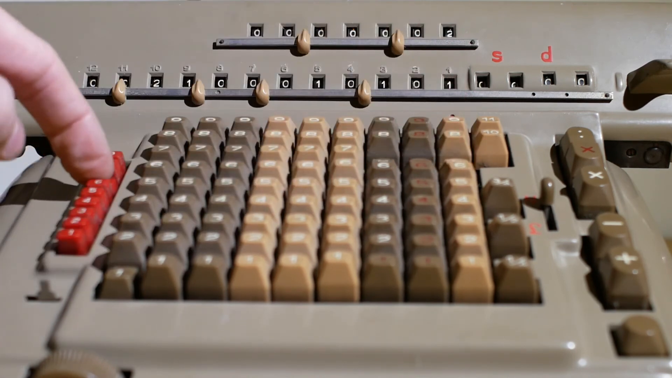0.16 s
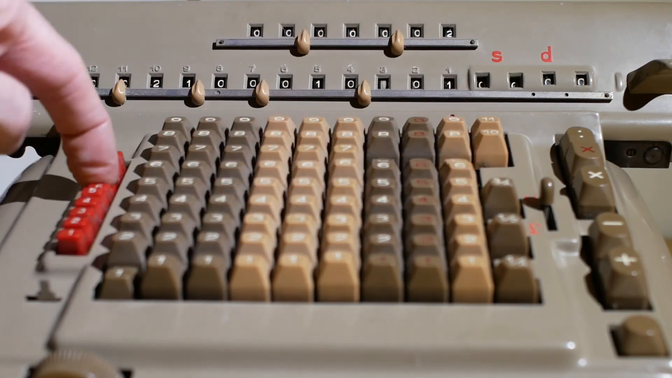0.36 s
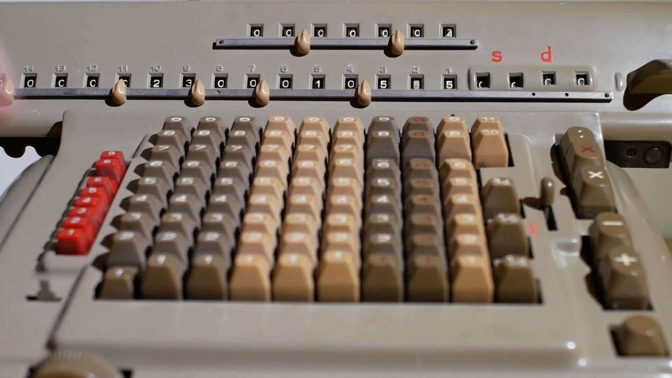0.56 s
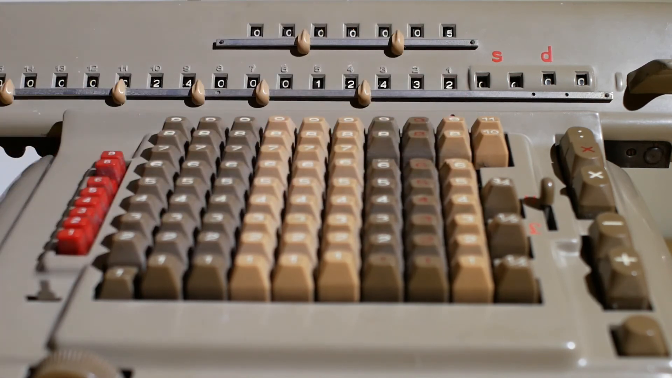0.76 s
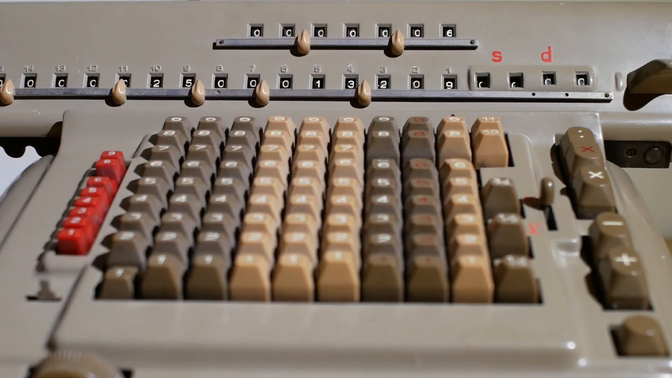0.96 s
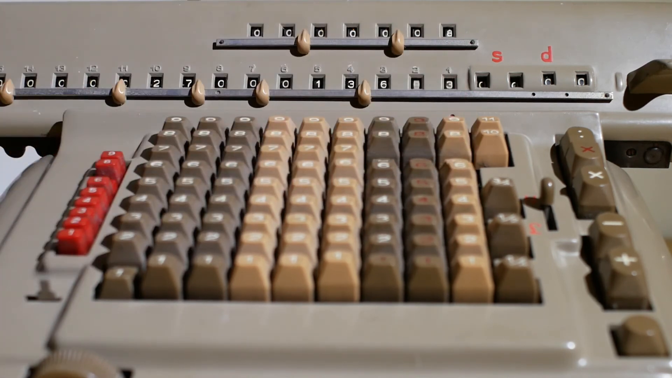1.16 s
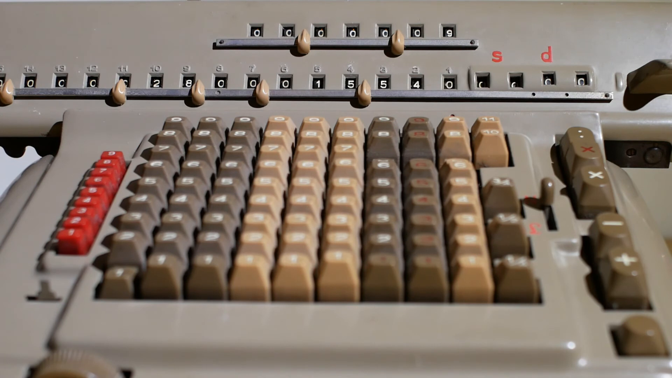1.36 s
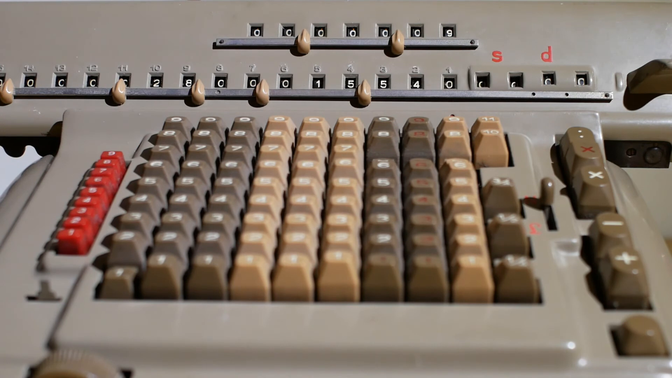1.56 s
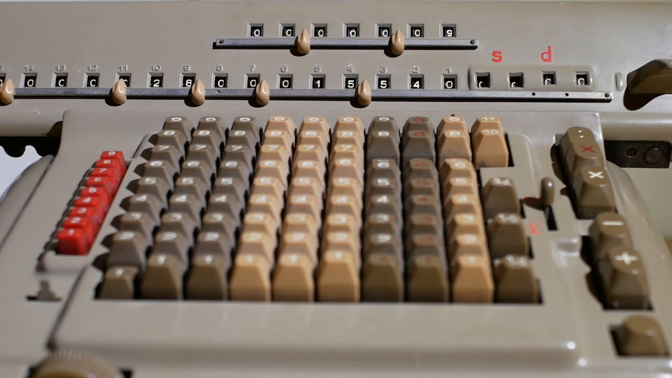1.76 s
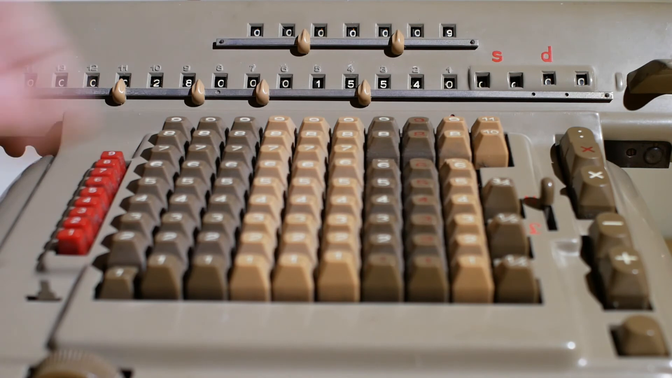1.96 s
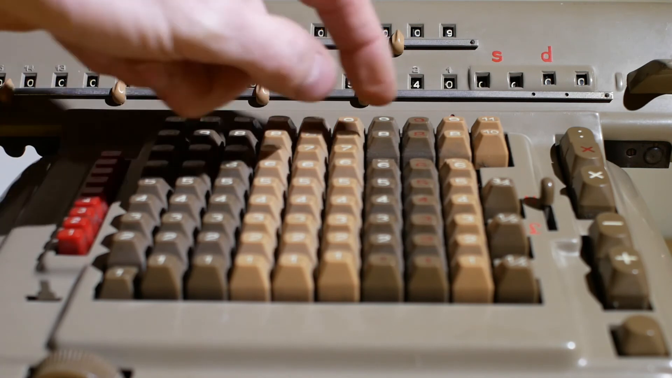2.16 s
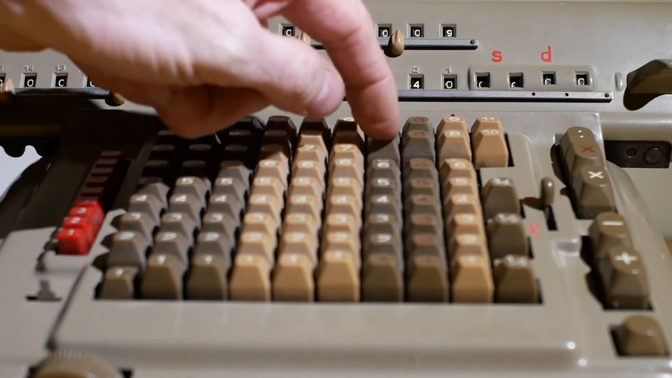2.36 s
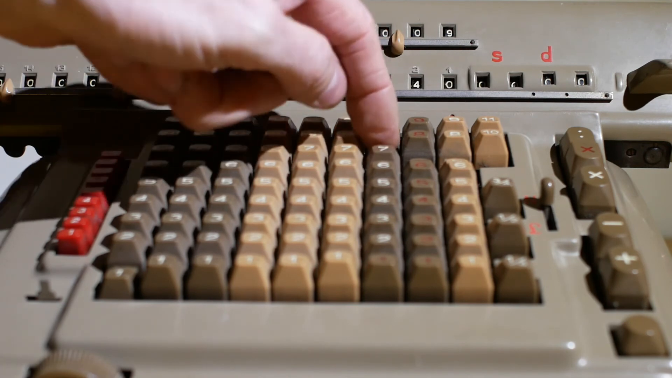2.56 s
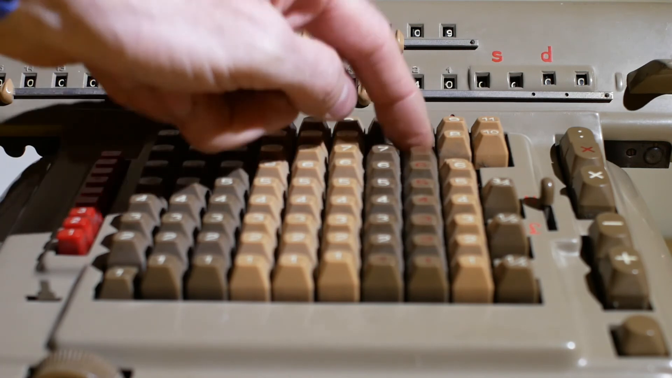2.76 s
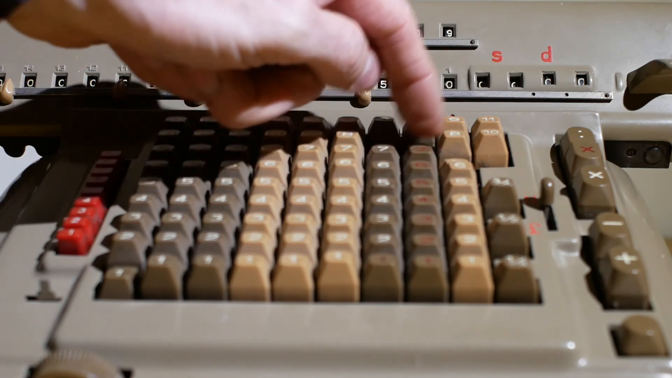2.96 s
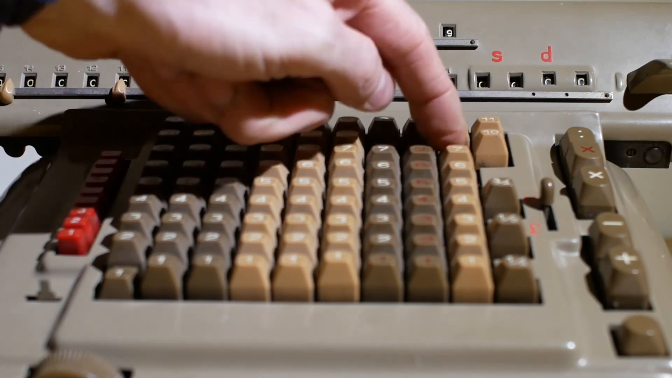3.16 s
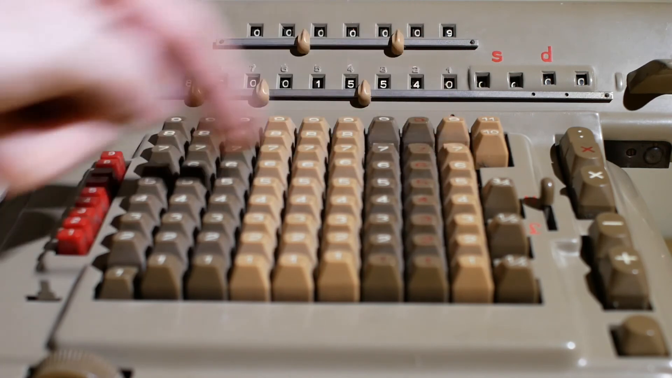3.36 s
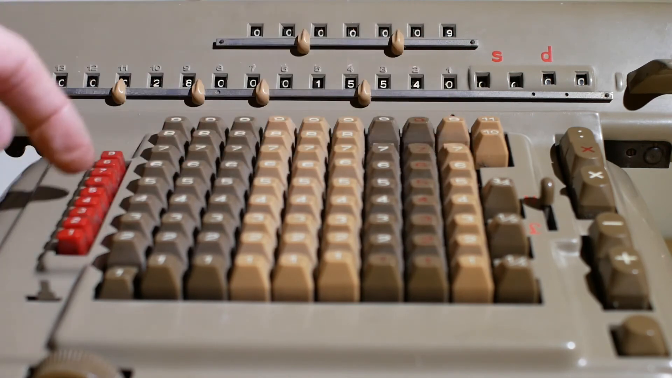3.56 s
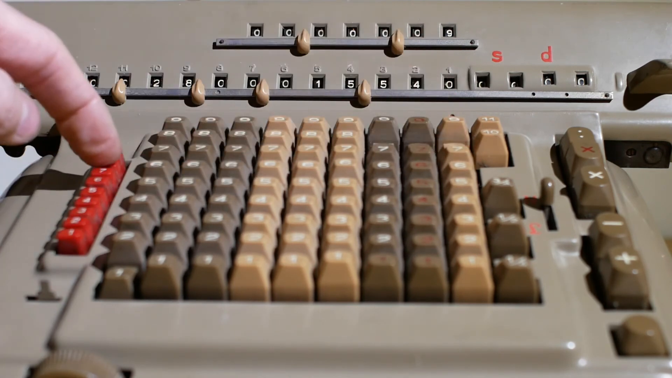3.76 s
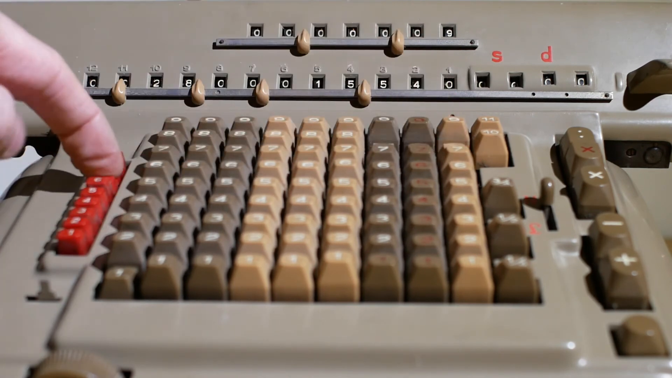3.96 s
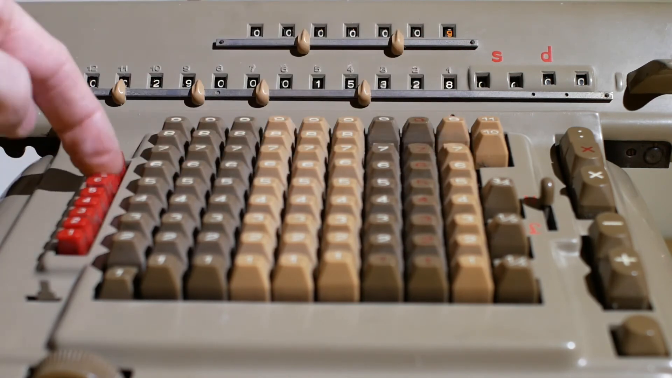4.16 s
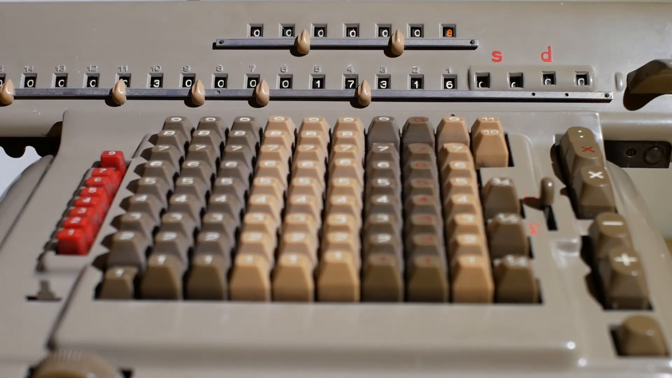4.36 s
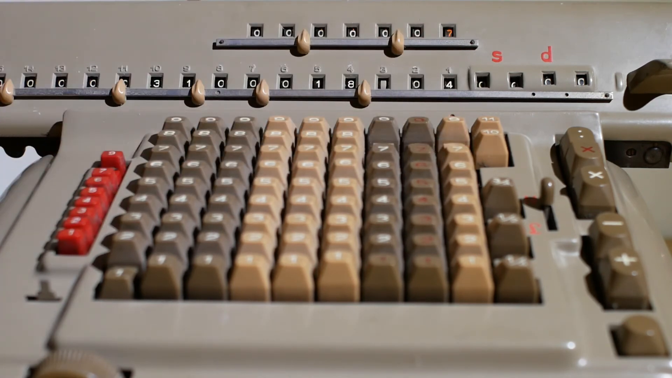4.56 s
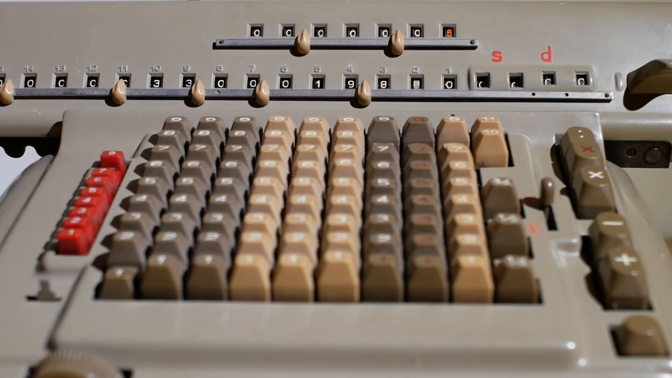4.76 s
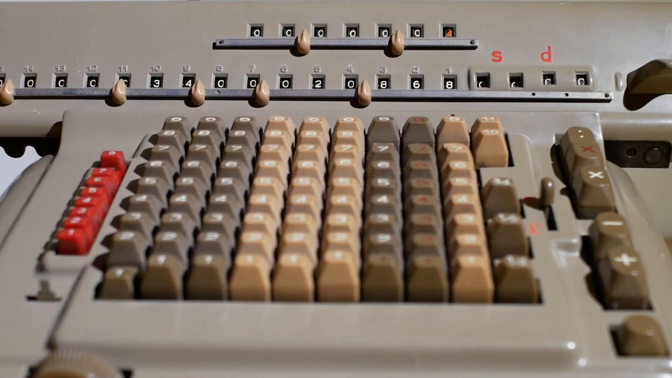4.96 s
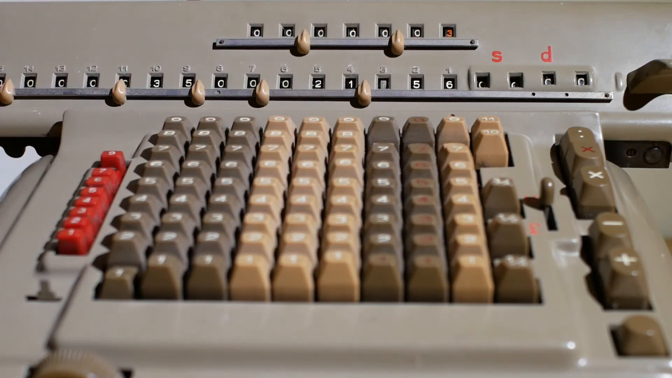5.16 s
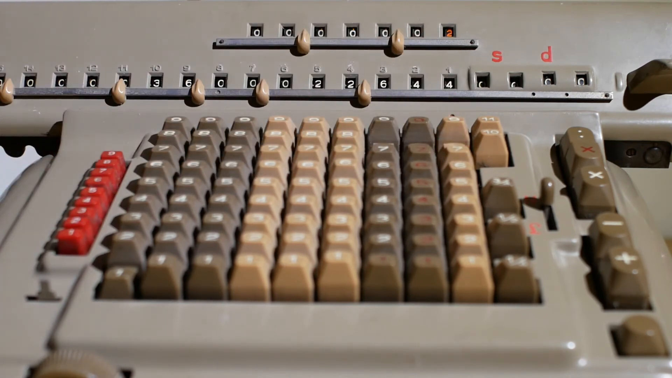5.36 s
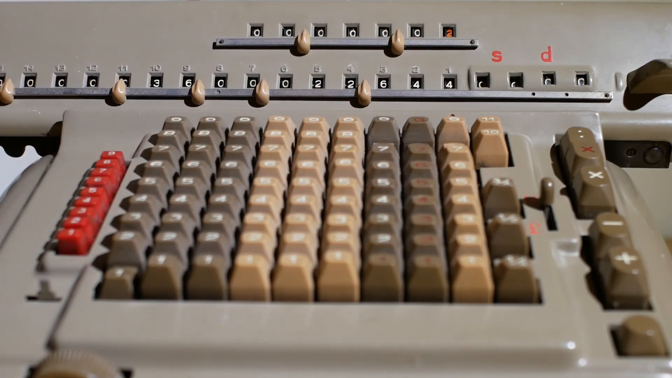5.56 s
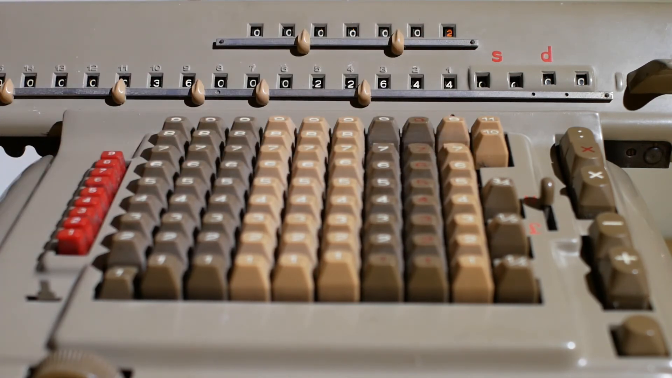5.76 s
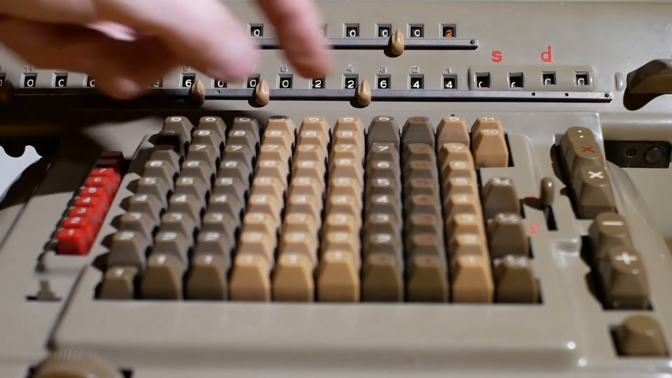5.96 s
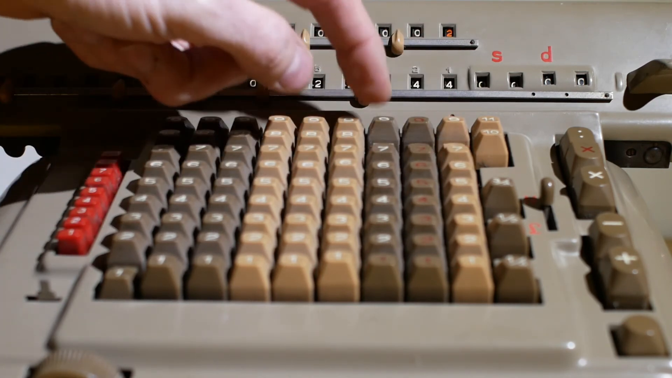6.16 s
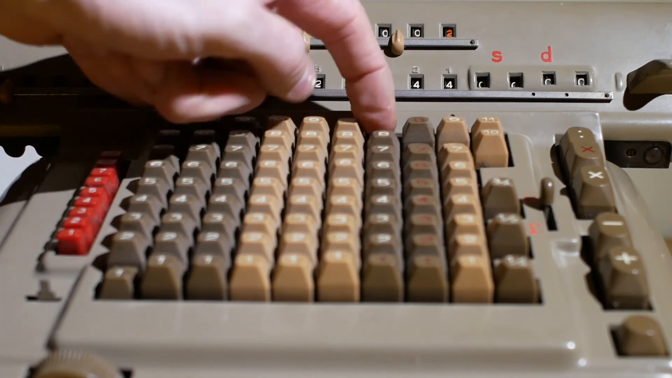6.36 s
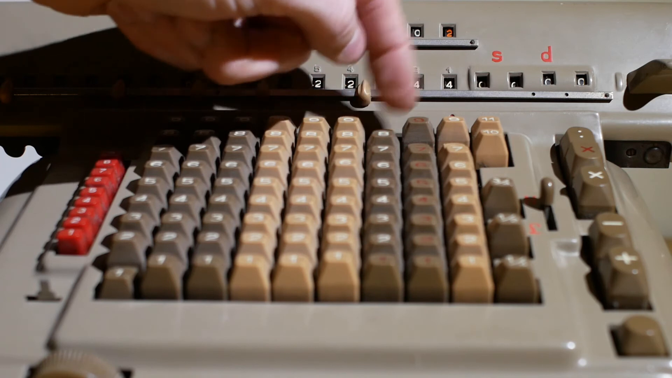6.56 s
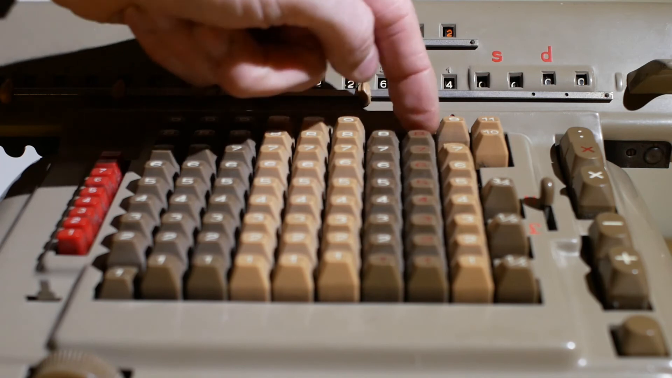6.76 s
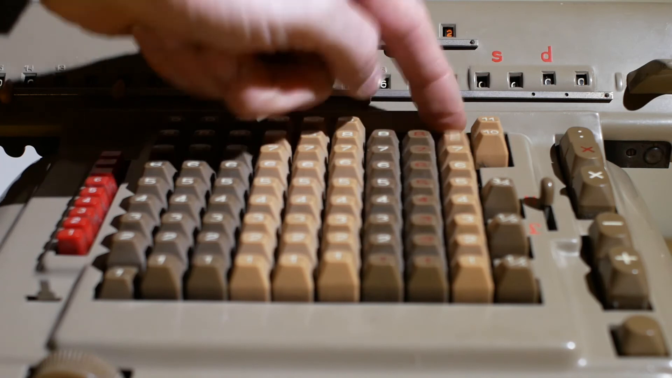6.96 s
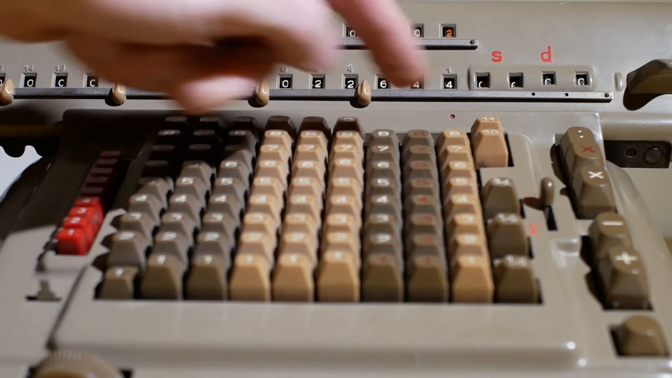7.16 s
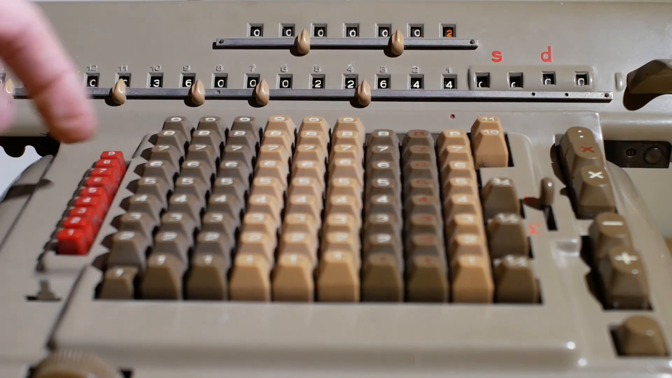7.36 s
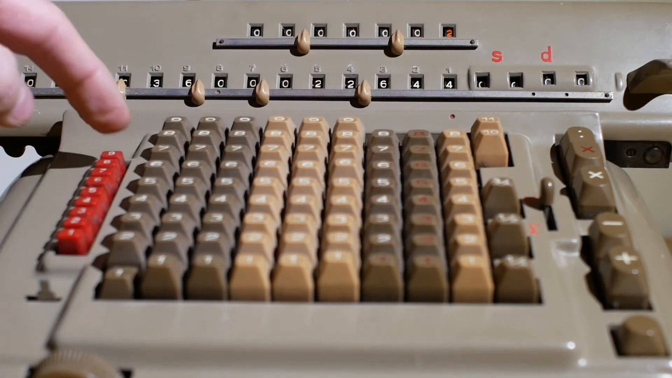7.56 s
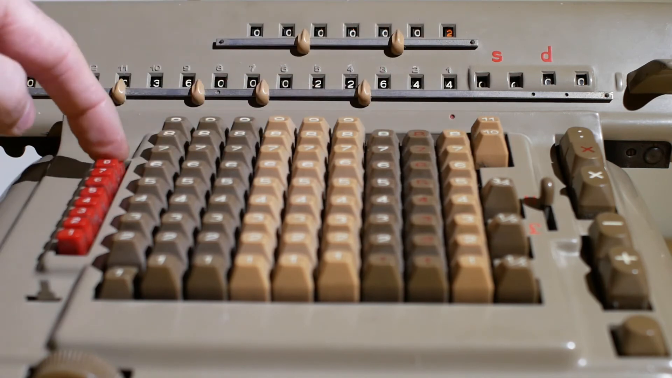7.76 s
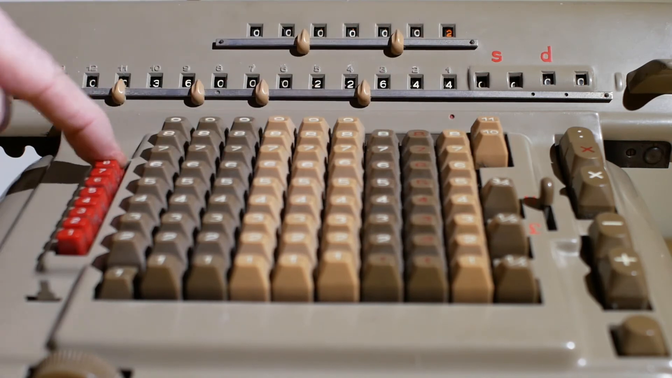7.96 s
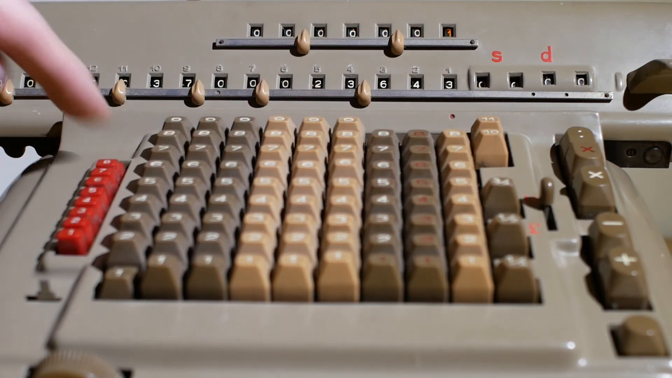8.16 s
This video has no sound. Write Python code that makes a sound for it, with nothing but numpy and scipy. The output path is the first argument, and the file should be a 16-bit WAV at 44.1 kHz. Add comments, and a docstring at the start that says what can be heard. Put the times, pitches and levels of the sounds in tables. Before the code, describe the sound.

A motor-driven mechanical calculator sits close to two microphones in a quiet, slightly reflective room with a low steady room tone. After faint fingertip clicks, a hard key snap at 0.2 s starts the motor; the clutch bites at 0.33 s and gears clatter, with a bright clack and springy tick about 6.6 times a second, loose metal knocking, number racks slamming and a throbbing midrange whine. It lets go with clunks around 1.4 s and the whirr coasts away by 2.3 s. Firm digit keys snap down at about 2.4, 2.8 and 3.1 s, with lighter releases. The motor key at 4.0 s starts a similar run until 5.3 s, fading by about 6.2 s with small settling clicks. Three more digit keys fall at 6.3, 6.7 and 7.0 s. A light click at 7.6 s precedes the last start at 7.9 s; clattering resumes and is cut off abruptly around 8.4 s.

```python
"""A mechanical calculator on a desk in a quiet room, close to two microphones.
A finger presses digit keys as well as a motor key that starts each of three runs: the main shaft turns
about 6.6 times a second, a pawl ticks and a stop clacks once a turn, and the motor coasts to rest.
Blows are noise bursts, pitched knocks and rings; gears are streams of random contacts through resonances;
the whine is throbbing sine tones. Sparse reflections and a steady room tone surround the machine."""
import sys
import numpy as np
from scipy import signal
from scipy.fft import rfft, irfft, next_fast_len
from scipy.io import wavfile
from scipy.ndimage import uniform_filter1d

SR = 44100
rng = np.random.default_rng(int(sys.argv[2]) if len(sys.argv) > 2 else 0)


def dump(signal):
    """Clip the signal to [-1, 1] and save it as 16-bit WAV at the path in sys.argv[1]."""
    limited = np.clip(np.atleast_2d(signal).T, -1, 1)
    pcm = np.round(limited * 32767).astype(np.int16)
    wavfile.write(sys.argv[1], SR, pcm)


N = 365587  # samples

# Levels in the tables are relative: each layer's trim and the final mix come after them.


def gain_of(db):
    """Decibels to gain."""
    return 10 ** (np.asarray(db) / 20)


def evened(x):
    """Scales to rms 1."""
    return x / np.sqrt(np.mean(x ** 2) + 1e-20)


def read(points, hz):
    """Reads a spectrum on a log-frequency axis."""
    f, value = np.transpose(points)
    return np.interp(np.log(hz + 1), np.log(f + 1), value)


def bumps(hz, modes):
    """Resonant bumps in dB."""
    return sum(lift / (1 + (2 * (hz - f) / width) ** 2) for f, width, lift in modes)


def add(mix, s, sound):
    """Mixes a sound in at s seconds."""
    part = mix[round(s * SR):][:len(sound)]
    part += sound[:len(part)]


def fade_in(t, rise_s):
    """A straight rise from silence to full level."""
    return np.minimum(t / rise_s, 1)


def decay(peak_db, t, t60):
    """An exponential decay that falls 60 dB in t60 seconds."""
    return gain_of(peak_db - 60 * t / t60)


def coloured(x, points, modes):
    """Causal minimum-phase filter of energy 1: a smooth spectrum with resonant bumps on it."""
    hz = np.abs(np.fft.fftfreq(8192, 1 / SR))
    db = read(points, hz) + bumps(hz, modes)
    log_gain = np.log(gain_of(np.maximum(db - db.max(), -100)))
    minimum_phase = np.exp(np.conj(signal.hilbert(log_gain)))
    taps = np.fft.ifft(minimum_phase).real[:4096]
    return signal.oaconvolve(x, taps / np.linalg.norm(taps))[:N]


def ring(x, modes):
    """Sum of two-pole resonances."""
    return sum(gain_of(db) * signal.lfilter(*signal.iirpeak(hz, hz / width, SR), x) for hz, width, db in modes)


def resonate(x, hz, width):
    """A moving resonance: shifts the curve hz down to zero, smooths, and shifts back."""
    turn = np.exp(2j * np.pi * np.cumsum(hz) / SR)
    r = np.exp(-np.pi * width / SR)
    return 2 * (turn * signal.lfilter([1 - r], [1, -r], x / turn)).real


def grit(count, per_s, spread_db, smooth):
    """Sparse contacts of uneven size over a little smooth noise, rms 1."""
    chance, size, sign = rng.random((3, count))
    sizes = gain_of(spread_db * np.minimum(-np.log(size + 1e-9), 4))
    contacts = sizes * (chance < per_s / SR) * np.sign(sign - .5)
    return evened(evened(contacts) + smooth * rng.standard_normal(count))


# room tone spectrum: (frequency [Hz], level [dB per Hz])
AIR_SPECTRUM = [(15, -74), (25, -43), (130, -13), (200, -3), (575, -13), (754, -10.5), (1400, -20),
                (2480, -29), (10100, -37), (14400, -42), (16000, -69)]
# bands standing out of the room tone: (frequency [Hz], width [Hz], lift [dB])
AIR_HUMS = [(98.6, 12, 11), (192.3, 14, 7), (242.8, 6.9, 8), (746, 23, 7), (1030, 54, 8.5),
            (2520, 330, 8.5)]
# how alike the room tone is at the two microphones: (frequency [Hz], left-right likeness [-1 to 1])
AIR_LIKENESS = [(60, 0.36), (240, 0.77), (950, 0.041), (3770, 0.37), (15000, 0.6)]
AIR_DB = -45.5  # rms before the microphones


def air():
    """Steady room tone: shaped noise, partly shared by both microphones."""
    hz = np.fft.rfftfreq(N, 1 / SR)
    left, other = rfft(rng.standard_normal((2, N)))
    same = np.clip(read(AIR_LIKENESS, hz), -1, 1)
    both = np.array([left, same * left + np.sqrt(1 - same ** 2) * other])
    spectrum = gain_of(read(AIR_SPECTRUM, hz) + bumps(hz, AIR_HUMS))
    return gain_of(AIR_DB) * evened(irfft(both * spectrum, N))


# clicks: a fingertip lands, a lever catches inside a press, a part settles as the motor coasts:
# (time [s], treble level [dB], knock level over the treble [dB])
CLICKS = [(.035, -36, -12), (.1472, -41, -1), (.179, -24.5, -11), (1.9335, -34, -3), (2.149, -42, 1),
          (2.3218, -24.5, -14), (2.41, -38, -3), (2.4254, -33, 5), (3.059, -24, -7), (3.0755, -16, -10),
          (3.66, -42, -8), (3.81, -42, -8), (3.901, -27.5, -18), (3.9154, -28.5, -4), (3.935, -36, -5),
          (5.7353, -33.5, -2), (5.8603, -34, -8), (6.3594, -13.5, -2), (6.959, -26, -17),
          (7.642, -24.5, -16)]
# what else a click holds, over its treble: (case thud [dB], shiver [dB])
CLICK_BODY = (-20, -10)
CLICK_KNOCK_HZ = 2900


def clicks():
    """Short clicks as blow rows, from faint to strong: one knock pitch, differing in level and knock."""
    return [(s, db, knock_db, CLICK_KNOCK_HZ, *CLICK_BODY) for s, db, knock_db in CLICKS]


# motor runs: (motor key time [s], clutch bite time [s], clutch level [dB], halt level [dB])
MOTOR_RUNS = [(0.2242, 0.332, -2.5, -3), (3.9618, 4.0779, -1.5, -7), (7.874, 7.9983, -3, -6)]
# the motor key's two blows: (time from the key cue [s], treble level [dB], knock over the treble [dB],
# knock pitch [Hz], case thud over the treble [dB], shiver over the treble [dB])
MOTOR_KEY_BLOWS = [(0, -6, -10, 3500, -24.5, -8), (.009, -15.5, 2.5, 3290, -22, -1)]


def motor_key():
    """The motor key as blow rows: two blows in quick succession start each run."""
    return [(run[0] + s, *rest) for run in MOTOR_RUNS for s, *rest in MOTOR_KEY_BLOWS]


# shaft turns, one list a run; a stop snaps home inside each turn and the pawl ticks at its end:
# (pawl tick time [s], tick level [dB], stop level [dB], boom level [dB])
SHAFT_TURNS = [
    [(.4873, -11, -7.5, -33), (.6424, -10.5, -7, -26.5), (.7916, -16.5, -7, -34), (.9443, -11, -8, -32.5),
     (1.0934, -10, -8, -31), (1.2426, -11.5, -6, -30.5), (1.3932, -12.5, -12.5, -40)],
    [(4.2373, -10.5, -11, -33), (4.3874, -11, -4, -34), (4.5376, -10.5, -7, -30.5),
     (4.6862, -12.5, -7, -36.5), (4.8379, -14.5, -7.5, -34.5), (4.9886, -13, -8, -33.5),
     (5.1392, -10.5, -7, -36), (5.2899, -15.5, -10, -29.5)],
    [(8.1595, -11, -18, -38), (8.31, -11, -9, -30)],
]
TURN_S = .15  # length given to the first turn and to the one after the last tick
# spin-up from the motor key: (time [s], gear rattle level [dB], motor whirr level [dB],
# case drumming level [dB], whirr centre [Hz])
SPIN_UP_CURVE = [(.004, -25.5, -31.5, -35, 600), (0.081, -26, -19, -39, 1150), (.13, -24, -31, -39, 1150),
                 (.3, -22.5, -26.5, -38, 1150)]
# run-down from the last pawl tick, same columns as the spin-up:
# (time [s], rattle level [dB], whirr level [dB], drumming level [dB], whirr centre [Hz])
RUN_DOWN_CURVE = [(-.05, -23, -27, -39.5, 1090), (.075, -23, -41, -39.5, 1100), (.2, -36, -36.5, -38, 1050),
                  (.28, -41, -38.5, -55, 1020), (.38, -42.5, -34.5, -55, 980), (.47, -45.5, -42, -65, 930),
                  (.77, -54, -56, -65, 800), (.91, -80, -62, -62, 800)]


def motion(column, rest):
    """One column of spin-up and run-down laid over every run; rest between runs."""
    rows = []
    for run, turns in zip(MOTOR_RUNS, SHAFT_TURNS):
        start, last_tick = run[0], turns[-1][0]
        rows += [(start, rest), (last_tick + RUN_DOWN_CURVE[-1][0] + .01, rest)]
        rows += [(start + r[0], r[column]) for r in SPIN_UP_CURVE]
        rows += [(last_tick + r[0], r[column]) for r in RUN_DOWN_CURVE]
    return np.interp(np.arange(N) / SR, *np.transpose(sorted(rows)))


def curve(column):
    """A level of the motor runs as a gain at every sample, inaudible between runs."""
    return gain_of(motion(column, -120))


# how the load changes through one shaft turn:
# (turn [0-1], rattle level [dB], drumming level [dB], spring jingle level [dB])
TURN_LOAD = [(0, -4.5, -17, -6), (.08, 0, 6.5, 4.5), (.18, -4, 4, 1), (.28, -1, -6, 1), (.34, -0.5, 8, 7),
             (.42, 0, 3.5, 8.5), (.52, 1.5, 2.5, 6.5), (.65, -1, -2.5, 3.5), (.74, -2.5, 10, 2),
             (.82, -2.5, -4, -15.5), (.96, -4, -6, -5.5)]


def load(column, idle_db):
    """The load pattern played along the shaft angle; idle_db outside the turns."""
    t, level_db, rows = np.arange(N) / SR, np.full(N, idle_db), np.array(TURN_LOAD)
    for turns in SHAFT_TURNS:
        s = np.array(turns)[:, 0]
        s = np.r_[s[0] - TURN_S, s, s[-1] + TURN_S]
        turning = (t > s[0]) & (t < s[-1])
        angle = np.interp(t, s, np.arange(len(s)))[turning]
        level_db[turning] = np.interp(angle, rows[:, 0], rows[:, column], period=1)
    return gain_of(level_db)


# gear rattle spectrum: (frequency [Hz], level [dB per Hz])
RATTLE_SPECTRUM = [(88, -66.5), (150, -16), (254, -19), (303, -3), (494, -13), (730, -7), (1040, -11),
                   (1170, -7), (1340, -9), (5360, -13.5), (9260, -11.5), (14800, -35.5), (16000, -43)]
# what the steel frame adds to every blow and to the rattle: (frequency [Hz], width [Hz], lift [dB])
FRAME_MODES = [(589, 22, 8), (746, 33, 6.5), (996, 20, -2.5), (1520, 29, 2), (2483, 200, 2.5),
               (9280, 930, 3), (10300, 120, 4)]
# small springs that jingle: (frequency [Hz], width [Hz], level [dB])
SPRING_MODES = [(8870, 320, -5.5), (9410, 390, 2), (10230, 710, -3)]
# the hollow case: (frequency [Hz], width [Hz], level [dB])
CASE_MODES = [(300.8, 33, 3), (376, 60, 5), (545, 140, -7), (700, 108, 6)]


def gears():
    """Thousands of tooth contacts ring frame and springs; the motor whirrs; the case drums and shakes the desk."""
    clumps = gain_of(1.2 * evened(uniform_filter1d(rng.standard_normal(N), 250)))  # contacts come in clumps
    contacts = grit(N, 6000, 2.4, 0.74) * clumps
    rattle = coloured(contacts * curve(1) * load(1, -0.89), RATTLE_SPECTRUM, FRAME_MODES)
    jingle = evened(ring(grit(N, 900, 1.8, 0.55), SPRING_MODES)) * curve(1) * load(3, 1.2)
    centre_hz = motion(4, 600)
    whirr = resonate(grit(N, 400, 2.2, 0.99), centre_hz, 570)
    whirr = evened(resonate(whirr, centre_hz, 407)) * curve(2)
    body_modes = CASE_MODES[:3] + [(111, 100, -5.5)]
    drumming = evened(ring(rng.standard_normal(N), body_modes)) * curve(3) * load(2, -.5)
    return gain_of(-2.5) * rattle + gain_of(-9.5) * jingle + gain_of(-8.5) * whirr + gain_of(-8.0) * drumming


def clanks():
    """Loose levers and racks knock at random, each of 24 parts with its own short ring."""
    t, out = np.arange(700) / SR, np.zeros(N)
    for hz in np.exp(rng.uniform(np.log(1400), np.log(6500), 24)):
        sizes = gain_of(4.1 * np.minimum(rng.exponential(1, N), 4))
        knocks = sizes * (rng.random(N) < 14 / SR)  # about 14 a second
        out += signal.oaconvolve(knocks, decay(0, t, .014) * np.sin(2 * np.pi * hz * t))[:N]
    return gain_of(-12.0) * evened(out) * curve(1) * load(1, -0.5)


# the loudest throbs of a gear whine under load: (time [s], level [dB])
WHINE_THROBS = [(.291, -23), (.5122, -19.5), (0.6878, -15.5), (.7414, -17), (.827, -19.5), (1.0341, -20),
                (1.111, -15.5), (1.2252, -20), (1.282, -20), (1.3353, -17), (1.3995, -16), (4.0544, -21),
                (4.2418, -18), (4.3626, -16), (4.4212, -13.5), (4.4796, -19), (4.6325, -19), (4.7323, -18),
                (4.8798, -20), (4.9224, -21), (4.9717, -17.5), (5.0448, -21), (5.0924, -19.5),
                (5.1481, -19), (5.2827, -19), (8.1485, -20), (8.2242, -17.5), (8.2661, -17.5)]
WHINE_HZ, WHINE_SPREAD = 1182.3, 0.0053  # spread: pitch scatter from throb to throb, as a fraction
# pitches the fainter throbs pick from: (frequency [Hz])
FAINT_PITCHES = (1148, 1180, 1188, 1192, 1255)
FAINT_GAP_S, FAINT_DB = .05, -24  # one faint throb falls at random in each gap


def whine():
    """Each throb is a quick swell of a slightly unsteady sine tone."""
    t, out = np.arange(3000) / SR, np.zeros(N)
    rows = [(s, db, WHINE_HZ) for s, db in WHINE_THROBS]
    for turns in SHAFT_TURNS:
        slots = np.arange(turns[0][0] - FAINT_GAP_S, turns[-1][0], FAINT_GAP_S)
        rows += [(s + FAINT_GAP_S * rng.random(), FAINT_DB, rng.choice(FAINT_PITCHES)) for s in slots]
    for s, peak_db, hz in rows:
        drift = .006 * evened(uniform_filter1d(rng.standard_normal(len(t)), 200))
        wobble = 1 + WHINE_SPREAD * rng.standard_normal() + drift
        tone = np.sin(2 * np.pi * np.cumsum(hz * wobble) / SR)
        add(out, s, decay(peak_db, t, 0.14) * fade_in(t, 0.0038) * tone)
    return gain_of(-1.5) * out


# the clutch bites: (time from the bite [s], treble level over the run's clutch level [dB],
# knock over the treble [dB], knock pitch [Hz], case thud over the treble [dB], shiver over the treble [dB])
CLUTCH_BLOWS = [(-.017, -10.5, -2.5, 2700, -23, -14), (0, 0, -13.5, 2480, -24, -13)]
# the clutch lets go: (time from the last pawl tick [s], treble level over the run's halt level [dB],
# knock over the treble [dB], knock pitch [Hz], case thud over the treble [dB], shiver over the treble [dB])
HALT_BLOWS = [(.022, 0, -11, 2560, -28, -11), (.071, -3, -18, 2430, -38, -8)]


def clutch():
    """The clutch as blow rows: it bites and lets go in every run."""
    rows = []
    for (_, bite, bite_db, halt_db), turns in zip(MOTOR_RUNS, SHAFT_TURNS):
        rows += [(bite + s, bite_db + db, *rest) for s, db, *rest in CLUTCH_BLOWS]
        rows += [(turns[-1][0] + s, halt_db + db, *rest) for s, db, *rest in HALT_BLOWS]
    return rows


# number racks slamming during a run: (time [s], treble level [dB], knock pitch [Hz])
RACK_SLAMS = [(0.344, -11, 2260), (.577, -13, 3340), (.6902, -12, 3650), (1.1094, -11, 2450),
              (1.1368, -10, 3780), (1.166, -9, 3400), (1.296, -7.5, 2660), (1.4272, -7.5, 3170),
              (8.0895, -8.5, 2060)]
# what else a slam holds, over its treble: (knock [dB], case thud [dB], shiver [dB])
RACK_BODY = (-14, -21.5, -15)


def racks():
    """Slamming number racks as blow rows, each with its own knock pitch."""
    return [(s, db, RACK_BODY[0], hz, *RACK_BODY[1:]) for s, db, hz in RACK_SLAMS]


STOP_LAG_S = .061  # the stop snaps home this long after a turn begins


def stops():
    """Once a turn a bright snap mostly under a millisecond long; the lowest case mode swells around it."""
    t, u, hits = np.arange(60) / SR, np.arange(5000) / SR, np.zeros(N)
    # the first turn of a run begins as the clutch bites, the others at the pawl tick before
    begins = [[run[1], *np.array(turns)[:-1, 0]] for run, turns in zip(MOTOR_RUNS, SHAFT_TURNS)]
    snap = (t / 0.00016) * np.exp(1 - t / 0.00018) * np.sin(2 * np.pi * 10800 * t)
    boom = fade_in(u, 0.0069) * np.sin(2 * np.pi * CASE_MODES[0][0] * u)
    for s, (_, _, peak_db, boom_db) in zip(np.concatenate(begins) + STOP_LAG_S, sum(map(list, SHAFT_TURNS), [])):
        add(hits, s, gain_of(peak_db) * snap)
        add(hits, s - .012, decay(boom_db + 4.5, u, 0.22) * boom)
    return hits


def pawl():
    """Once a turn a small spring-steel part rings briefly: a noise burst through two resonances."""
    t, hits = np.arange(900) / SR, np.zeros(N)
    for s, peak_db, *_ in sum(map(list, SHAFT_TURNS), []):
        add(hits, s, decay(peak_db, t, 0.028) * rng.standard_normal(len(t)))
    return gain_of(8.0) * ring(hits, [(9010, 266, 4.5), (2600, 390, -8.5)])


# duller thuds as runs end: (time [s], level [dB], pitch [Hz])
END_THUDS = [(1.488, -28.5, 475), (5.417, -32.5, 507)]


def end_thuds():
    """A dull thud as a run ends: a low sine with a soft rise and a fast decay."""
    t, out = np.arange(5000) / SR, np.zeros(N)
    for s, peak_db, hz in END_THUDS:
        add(out, s, decay(peak_db, t, .2) * fade_in(t, 0.0045) * np.sin(2 * np.pi * hz * t))
    return out


# digit keys: (latch time [s], latch level [dB], bottom time [s], bottom level [dB], rebound level [dB],
# let-go time [s], let-go level [dB], knock pitch [Hz], knock over the treble [dB],
# case thud over the treble [dB], stem ring level [dB])
KEY_PRESSES = [(2.4344, -26, 2.4426, -6, -7, 2.5955, -34.5, 4400, -11, -11.5, -30),
               (2.7541, -17, 2.7765, -7, -13, 2.9312, -28.5, 3500, -11, -10, -27),
               (3.0634, -20, 3.085, -4.5, -11, 3.2189, -22, 2840, -9, -11.5, -17),
               (6.3265, -20, 6.3341, -11, -8.5, 6.518, -33, 3200, -3, -14, -13),
               (6.6547, -14.5, 6.6735, -6, -10.5, 6.825, -31, 3580, -4.5, -21, -24),
               (6.9661, -11, 6.979, -4, -12, 7.1007, -20.5, 3350, -6, -26, -28)]
# how each part of a press differs: (knock offset [dB], case thud offset [dB], shiver over the treble [dB])
LATCH_BODY = (-3, -14, -5)
BOTTOM_BODY = (0, 0, -10)
REBOUND_BODY = (-2, -5, -11.5)
# the key let go, over its treble: (knock [dB], case thud [dB], shiver [dB])
LET_GO_BODY = (-17, -23, -12.5)
REBOUND_S = .0146  # the key stem bounces once after bottoming


def digit_keys():
    """Digit keys as blow rows: latch, bottoming, one rebound and release of each press."""
    rows = []
    for latch, latch_db, bottom, bottom_db, rebound_db, up, up_db, hz, knock_db, thud_db, _ in KEY_PRESSES:
        parts = ((latch, latch_db, LATCH_BODY), (bottom, bottom_db, BOTTOM_BODY),
                 (bottom + REBOUND_S, rebound_db, REBOUND_BODY))
        for s, db, body in parts:
            rows.append((s, db, knock_db + body[0], hz, thud_db + body[1], body[2]))
        rows.append((up, up_db, LET_GO_BODY[0], hz, *LET_GO_BODY[1:]))
    return rows


# the key stem's resonance: (frequency [Hz], width [Hz], level [dB])
STEM_MODES = [(13600, 900, 0)]


def stems():
    """A thin, very high ring that follows the bottoming of each digit key."""
    t, out = np.arange(SR // 8) / SR, np.zeros(N)
    for press in KEY_PRESSES:
        add(out, press[2], decay(press[-1], t, .15) * rng.standard_normal(len(t)))
    return ring(out, STEM_MODES)


# treble spectrum of a blow: (frequency [Hz], level [dB per Hz])
BLOW_SPECTRUM = [(530, -33.5), (900, -5.5), (979, -15.5), (1150, -7.5), (3040, -7), (3340, -7),
                 (7770, -7.5), (10100, -4.5), (13700, -17.5), (15400, -32), (16000, -46)]


def blows(rows, crack_t60, knock_t60, shiver_t60, trim_db):
    """Each blow: a treble crack, a short pitched knock, a thud into the case, then loose levers shivering."""
    t = np.arange(SR // 3) / SR
    rise, push = fade_in(t, 0.0007), np.hanning(40)
    crack, knock, thud, shiver = np.zeros((4, N))
    for s, peak_db, knock_db, knock_hz, thud_db, shiver_db in rows:
        crack_noise, knock_noise = rng.standard_normal((2, len(t)))
        levers = grit(len(t), 3000, 2.9, 0.88)
        pitched = np.sin(2 * np.pi * knock_hz * t) + .9 * knock_noise
        add(crack, s, decay(peak_db, t, crack_t60) * rise * crack_noise)
        add(knock, s, decay(peak_db + knock_db, t, knock_t60) * rise * pitched)
        add(thud, s, gain_of(peak_db + thud_db) * push)
        add(shiver, s, decay(peak_db + shiver_db, t, shiver_t60) * fade_in(t, 0.0037) * levers)
    crack = signal.lfilter(*signal.butter(2, 5000, "high", fs=SR), crack)
    knock = signal.lfilter(*signal.butter(2, 5000, fs=SR), knock)
    treble = coloured(crack + shiver, BLOW_SPECTRUM, FRAME_MODES)
    return gain_of(trim_db) * (treble + gain_of(8.5) * knock + gain_of(14.0) * ring(thud, CASE_MODES[1:]))


def room(x):
    """Sparse decaying reflections of random sign, other ones at each microphone."""
    taps = np.zeros((2, SR // 2))
    grid = np.arange(60, SR // 2 - 20, 20)
    at = grid + rng.integers(0, 20, (2, len(grid)))
    np.put_along_axis(taps, at, rng.choice([-1., 1.], at.shape), 1)
    taps *= decay(0, np.arange(SR // 2) / SR, 0.17)
    return signal.fftconvolve(x[None], taps / np.linalg.norm(taps[0]), axes=1)[:, :N]


def scene():
    """The machine, its reflections and the room tone."""
    key_blows = blows(clicks() + motor_key() + digit_keys(), 0.025, 0.008, 0.21, -6.0)
    drive_blows = blows(clutch() + racks(), 0.01, 0.024, 0.25, -4.0)
    running = gears() + clanks() + whine() + stops() + pawl() + end_thuds()
    machine = key_blows + drive_blows + running + stems()
    return gain_of(0.04) * machine + gain_of(-6.0) * room(machine) + air()


# stereo balance by frequency: (frequency [Hz], left minus right [dB])
STEREO_LEAN = [(60, -2.5), (180, 3.0), (550, 0), (1650, -1.0), (4970, 1.0), (15000, 0)]
EDGE_HZ = 15600  # upper band limit


def record(dry):
    """Two microphones that lean a little by frequency; a narrow notch, bass cut, soft overload and band limit."""
    size = next_fast_len(N)
    lean = gain_of(np.outer([.5, -.5], read(STEREO_LEAN, np.fft.rfftfreq(size, 1 / SR))))
    heard = irfft(rfft(dry, size) * lean, size)[:, :N]
    heard = signal.lfilter(*signal.iirnotch(7870, 90, SR), heard)
    heard = signal.lfilter(*signal.butter(2, 75, "high", fs=SR), heard)
    heard = np.tanh(heard / .9) * .9
    band_limit = signal.firwin(255, EDGE_HZ, window=("kaiser", 9), fs=SR)
    return signal.oaconvolve(heard, band_limit[None], "same")


dry = scene()
out = record(dry)
dump(out)
```